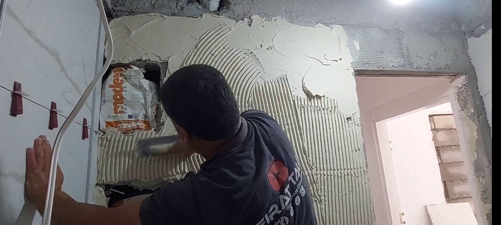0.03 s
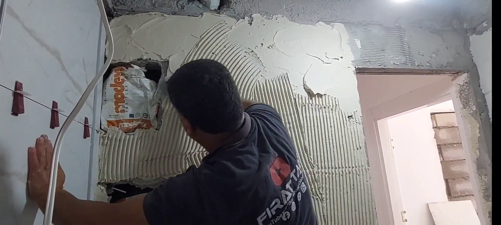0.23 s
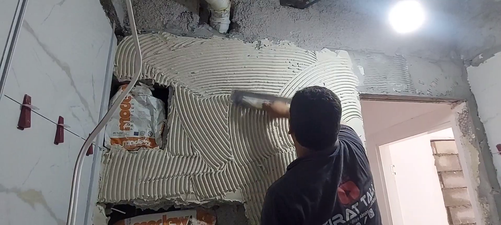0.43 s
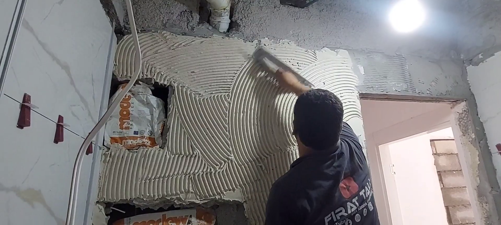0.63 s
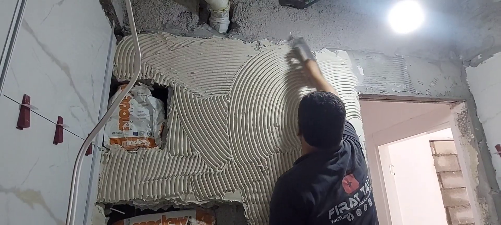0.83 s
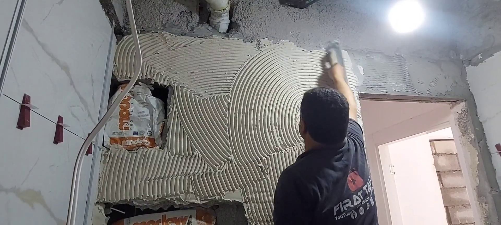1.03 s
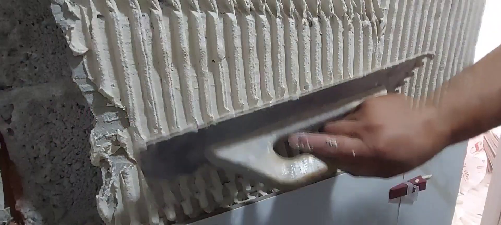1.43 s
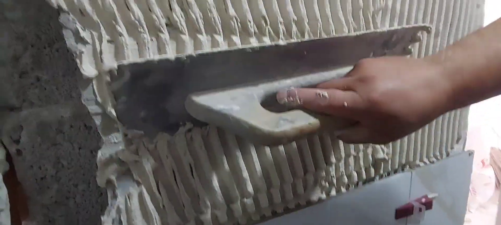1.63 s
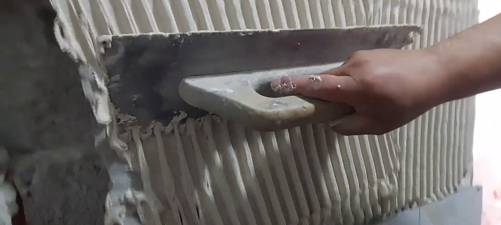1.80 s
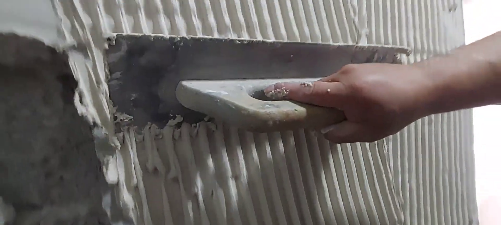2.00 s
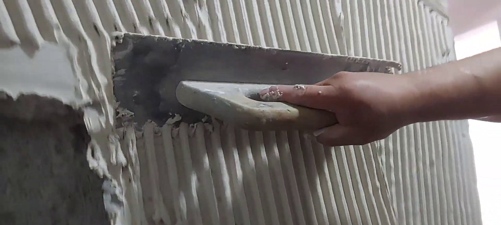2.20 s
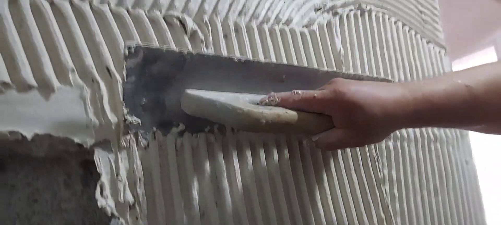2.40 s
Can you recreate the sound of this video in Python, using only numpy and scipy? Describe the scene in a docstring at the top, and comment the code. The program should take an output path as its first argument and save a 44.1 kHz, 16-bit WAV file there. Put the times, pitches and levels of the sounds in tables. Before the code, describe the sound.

A notched trowel scrapes adhesive across a wall in a small, bare room. A short push swells until 0.3 seconds, then a long, hollow, more distant sweep runs to 1.3, with a soft bump near 1.1. A close, gritty pull builds from 1.4 to 2.4 seconds, with small cracking grains and a wet hiss. A light knock comes at 2.5. A faint low rumble lies underneath.

```python
"""A notched steel trowel combs tile adhesive on the wall of a small, bare bathroom: three abrupt strokes.
The teeth stick and slip (low rasp); sand crunches and hisses under the blade. Faint rumble and whine.
0-0.3 s: a short push of growing force. 0.3-1.3 s: a wide arc heard from across the room; wall and room
ring hollow, the trowel bumps late in the sweep. From 1.3 s: a close, gritty pull; coarse grains crack,
wet adhesive hisses through the notches. At 2.5 s: a light knock."""
import sys
import numpy as np
from scipy import signal
from scipy.fft import rfft, irfft, next_fast_len
from scipy.io import wavfile
from scipy.ndimage import uniform_filter1d

SR = 44100
rng = np.random.default_rng(int(sys.argv[2]) if len(sys.argv) > 2 else 0)


def wav_record(signal):
    """Record a signal, one row per channel, as 16-bit PCM in the file named by sys.argv[1]."""
    frames = np.transpose(np.atleast_2d(signal))
    bounded = np.clip(frames, -1, 1)
    # unit amplitude maps onto the largest positive 16-bit level
    quanta = np.round(bounded * 32767).astype(np.int16)
    wavfile.write(sys.argv[1], SR, quanta)


N = 112454
TIME_S = np.arange(N) / SR
FFT_SIZE = 2 * next_fast_len((N + SR // 2) // 2)
FREQ_HZ = np.maximum(np.arange(FFT_SIZE // 2 + 1) * SR / FFT_SIZE, 1)
PUSH_END_S, ARC_END_S = .301, 1.327

# room decay: f/Hz, t60/s
ROOM_DECAY = [(250, 0.41), (1000, 0.31), (4000, 0.2), (12000, 0.053)]
# left-right correlation of the room tail: f/Hz, correlation/1
ROOM_CORRELATION = [(150, 0.93), (300, 0.75), (600, 0.52), (1100, 0.014), (16000, 0)]
# building rumble: f/Hz, relative density/dB
RUMBLE_SPECTRUM = [(25, -16), (48, 11), (75, 6), (130, 2), (220, -9), (600, -19.5), (1500, -31),
                   (5000, -25), (6800, -43), (16000, -42)]
# electrical whine: f/Hz, level/dB
WHINE_PARTIALS = [(4662, -72), (9320, -70.5), (13980, -75)]
# wall and room modes: f/Hz, scrape gain/dB, bump level/dB, t60/s
WALL_MODES = [(249.4, -13, -31.5, 0.59), (297.8, -10, -28.5, 0.77), (376.7, -17, -53, 0.29),
              (421.3, -15, -44, 0.96), (523.5, -18, -46, 0.34), (593, -40, -21.5, 0.2),
              (619, -11.5, -41, 0.29), (742, -19, -34, 0.35), (796, -12, -42, 0.56)]
# blade modes, damped by adhesive: f/Hz, gain/dB, t60/s
DAMPED_BLADE_MODES = [(2250, -21, .009), (3330, -18, .011), (3950, -7.5, .008), (4300, -7, .009),
                      (5700, -14, .004)]
# coarse grains cracking: t/s, impulse level/dB
CRACK_IMPULSES = [(1.5598, -4.5), (1.8612, -11), (1.8735, -6), (2.0513, -6.5), (2.0768, -9), (2.1818, -6),
                  (2.2012, -8), (2.2085, -9), (2.2855, -9), (2.2903, -6)]
# teeth catching in thicker adhesive: t/s, half-width/s, rasp swell/dB, grit swell/dB
TOOTH_CATCHES = [(1.862, .016, 3.5, 3), (2.037, .011, 7, 3), (2.098, .004, 0, 6), (2.138, .017, 7.5, 2.5),
                 (2.208, .009, 1, 3.5), (2.291, .007, 0, 3.5)]
# stroke envelopes, before trim: t/s, crunch level/dB, rasp level/dB, hiss level/dB
PUSH_LEVELS = [(0.088, -71, -85, -72), (0.102, -49, -50, -53), (0.126, -53.5, -43.5, -59),
               (0.168, -51, -59, -53), (0.19, -39, -41, -48), (0.226, -33, -30.5, -37),
               (0.265, -28.5, -27.5, -33.5), (0.298, -21, -23.5, -30.5)]
ARC_LEVELS = [(0.305, -43, -46, -51), (0.339, -28, -28.5, -35.5), (0.375, -30.5, -32.5, -33.5),
              (0.401, -26, -22.5, -33.5), (0.459, -27.5, -26.5, -35.5), (0.519, -25, -24, -33.5),
              (0.645, -24.5, -22.5, -32.5), (0.765, -26.5, -26, -32.5), (0.843, -30.5, -31, -41.5),
              (0.977, -25, -22.5, -34.5), (0.997, -25, -30.5, -32), (1.075, -28.5, -30, -31),
              (1.155, -34.5, -30, -43.5), (1.169, -33, -47, -47), (1.185, -33.5, -37, -40),
              (1.239, -43, -45, -51), (1.301, -63, -68, -64), (1.32, -85, -63, -89)]
PULL_LEVELS = [(1.335, -49, -52, -53), (1.4, -43, -44.5, -47), (1.47, -29, -40, -37.5),
               (1.51, -37.5, -36.5, -46), (1.56, -31.5, -34.5, -39), (1.61, -35.5, -38, -41),
               (1.72, -31.5, -34, -35.5), (1.87, -25, -29.5, -34), (1.92, -25, -31, -31.5),
               (2.0, -25, -31, -33), (2.1, -27, -28.5, -30), (2.18, -24.5, -28, -28),
               (2.29, -24.5, -28.5, -28.5), (2.37, -29, -33.5, -38), (2.41, -59, -52, -47.5),
               (2.48, -52, -66, -64), (2.55, -65, -49, -66)]
# colour of blade and wall: f/Hz, relative density/dB
PUSH_SPECTRUM = [(40, -9), (85, 12), (130, 0), (210, -6.5), (400, 3.5), (660, -0.5), (820, 2.5),
                 (1300, -0.5), (2200, -11.5), (3300, -7), (4800, -4), (6500, -16.5), (8000, -14),
                 (10000, -10), (16000, -11.5)]
ARC_SPECTRUM = [(50, -33), (100, -9.5), (195, -15.5), (250, -1.5), (470, 2), (620, 4.5), (820, 5.5),
                (1050, 1.5), (1700, -8.5), (2700, -11), (3700, -8.5), (4600, -6), (5400, -12.5),
                (6500, -27.5), (8000, -25), (10000, -22), (13000, -17), (16000, -22.5)]
PULL_SPECTRUM = [(50, -26), (110, -11.5), (170, -9.5), (270, -2), (350, -5), (550, -0.5), (720, 0.5),
                 (900, 1.5), (1350, -1.5), (1800, 0.5), (2650, -3), (3500, 1.5), (4500, 2.5), (5200, -1.5),
                 (6000, -5.5), (7000, -20.5), (8300, -21), (10700, -16.5), (16000, -19.5)]
# stereo position: f/Hz, left minus right/dB
PUSH_BALANCE = [(100, 2.5), (400, 2), (800, 8), (1300, 0), (2300, 5), (4200, -3), (5500, 11), (7000, 16),
                (11000, 11)]
ARC_BALANCE = [(150, -1), (400, 6.5), (650, 1), (1100, 2.5), (2000, 0.5), (3000, 1.5), (4200, -4),
               (5500, 2), (8200, 9.5), (12500, -1.5), (16000, -2)]
PULL_BALANCE = [(300, 0.5), (700, 0), (1200, 0.5), (1800, -2.5), (2700, -2), (3500, -8.5), (4700, -6),
                (5700, 6.5), (6800, 13), (8300, 18), (10800, 2.5), (16000, 3.5)]


def from_db(db):
    """Decibels to gain."""
    return 10 ** (np.asarray(db) / 20)


def rms(x):
    """Root mean square."""
    return np.sqrt(np.mean(x ** 2) + 1e-20)


def per_bin(table):
    """Table interpolated to the FFT bins over log frequency."""
    hz, value = np.transpose(table)
    return np.interp(np.log(FREQ_HZ), np.log(hz), value)


def pan(balance_db):
    """Constant-power left and right gains."""
    gains = from_db(np.array([[.5], [-.5]]) * balance_db)
    return gains / np.sqrt(np.mean(gains ** 2, axis=0))


def minimum_phase(gain):
    """Causal response with the given magnitude."""
    cepstrum = irfft(np.log(gain + 1e-7))
    cepstrum[..., 1:FFT_SIZE // 2] *= 2
    cepstrum[..., FFT_SIZE // 2 + 1:] = 0
    return np.exp(rfft(cepstrum))


def filtered(x, response):
    """Apply a frequency response."""
    return irfft(rfft(x, FFT_SIZE) * response)[..., :N]


def high_pass(x, hz):
    """Second-order bass cut."""
    return signal.sosfilt(signal.butter(2, hz, "high", fs=SR, output="sos"), x)


def drift(bandwidth_hz):
    """Low-passed noise, rms 1."""
    slow = filtered(rng.standard_normal(FFT_SIZE), 1 / (1 + (FREQ_HZ / bandwidth_hz) ** 2))
    return slow / rms(slow)


def ring(x, hz, t60_s):
    """One mode: a unit impulse starts a decaying unit sine."""
    radius = from_db(-60 / (t60_s * SR))
    step_rad = 2 * np.pi * hz / SR
    return signal.lfilter([0, np.sin(step_rad)], [1, -2 * radius * np.cos(step_rad), radius ** 2], x + 1e-18)


def impulse(t_s, level_db):
    """Single-sample click."""
    return from_db(level_db) * (np.arange(N) == int(t_s * SR))


def gate(start_s, end_s):
    """Window with 2 ms fades."""
    return np.clip(np.minimum(TIME_S - start_s, end_s - TIME_S) / .002, 0, 1)


def bathroom():
    """Diffuse stereo frequency response: treble dies first, bass is alike in both ears."""
    noise = rfft(rng.standard_normal((2, N)), FFT_SIZE)
    gap_s, tail = .00291, 0
    for band_hz, t60_s in ROOM_DECAY:
        band = per_bin([(hz, hz == band_hz) for hz, _ in ROOM_DECAY])
        decay = from_db(-60 * TIME_S / t60_s) * (TIME_S > gap_s)
        tail += irfft(noise * band)[:, :N] * decay / np.sqrt(np.sum(decay ** 2))
    spectrum = rfft(tail, FFT_SIZE)
    mid, side = spectrum / np.sqrt(uniform_filter1d(abs(spectrum) ** 2, size=250, axis=1))
    correlation = per_bin(ROOM_CORRELATION)
    return np.sqrt((1 + correlation) / 2) * mid + np.sqrt((1 - correlation) / 2) * side * [[1], [-1]]


def in_room(x, room, room_db):
    """Direct sound plus tail."""
    return filtered(x, 1 + from_db(room_db) * room)


def rumble(mid_db=-52.5, side_gain_db=-10):
    """Steady low background of the building."""
    mid, side = filtered(rng.standard_normal((2, FFT_SIZE)), from_db(per_bin(RUMBLE_SPECTRUM)))
    return from_db(mid_db) * (mid + from_db(side_gain_db) * side * [[1], [-1]]) / rms(mid)


def whine():
    """Thin, unsteady electrical tone with two overtones."""
    return sum(from_db(db) * drift(bandwidth_hz=90) * np.sin(2 * np.pi * hz * TIME_S)
               for hz, db in WHINE_PARTIALS)


def knock(room):
    """Light knock: one heavily damped mode."""
    return in_room(ring(impulse(t_s=2.5065, level_db=-27.5), hz=710, t60_s=.0078), room, room_db=-4)


def squeeze(peak_s=2.275, half_width_s=.05, centre_hz=11000, half_width_hz=900, level_db=-30):
    """Wet adhesive hisses through the notches under the hardest pressure."""
    hiss = filtered(rng.standard_normal((2, N)), 1 / (1 + ((FREQ_HZ - centre_hz) / half_width_hz) ** 2))
    swell = np.exp(-((TIME_S - peak_s) / half_width_s) ** 2)
    return from_db(level_db) * swell * hiss / rms(hiss)


def cracks(room, crumble_s=.0015, crumble_db=-27, clink_db=-2.5, fizz_db=-14):
    """Coarse grains snap and crumble: the coated blade clinks, the fragments fizz."""
    snaps = sum(impulse(t_s, db) for t_s, db in CRACK_IMPULSES)
    decays = signal.lfilter([1], [1, -np.exp(-1 / (crumble_s * SR))], snaps + 1e-18)
    crumbling = decays * rng.standard_normal(N)
    force = snaps + from_db(crumble_db) * crumbling
    blade = sum(from_db(db + clink_db) * ring(force, hz, t60_s) for hz, db, t60_s in DAMPED_BLADE_MODES)
    clink = signal.sosfilt(signal.butter(6, [1900, 5200], "band", fs=SR, output="sos"), blade)
    fizz = from_db(fizz_db) * high_pass(crumbling, hz=10000)
    return in_room(pan(balance_db=-7) * clink + fizz, room, room_db=-10)


def trowel_note(re_rasp_db=-8):
    """The trowel's hollow note: a noise-driven mode following the pull's rasp envelope."""
    t_s, _, rasp_db, _ = np.transpose(PULL_LEVELS)
    note = ring(rng.standard_normal(N), hz=713, t60_s=.053)
    return from_db(np.interp(TIME_S, t_s, rasp_db) + re_rasp_db) * note / rms(note)


def wall_ring(slips, bump_s=1.128, start_db=3.5, fade_db_per_s=10):
    """Slips and one bump ring wall and room; the wall answers less as the blade climbs."""
    t_s, _, rasp_db, _ = np.transpose(ARC_LEVELS)
    coupling_db = start_db - fade_db_per_s * (TIME_S - PUSH_END_S)
    force = slips * from_db(np.interp(TIME_S, t_s, rasp_db) + coupling_db)
    wall = 0
    for hz, scrape_db, bump_db, t60_s in WALL_MODES:
        mode_rms_gain = np.sqrt(t60_s * SR / (4 * np.log(1000)))
        wall += ring(from_db(scrape_db) * force / mode_rms_gain + impulse(bump_s, bump_db), hz, t60_s)
    return high_pass(wall, hz=200)   # the wall radiates little bass


def grains(per_s, spread_db, clump_db, clump_hz):
    """Tiny random impacts in clumps, size capped; rms 1."""
    sizes = from_db(spread_db * np.minimum(rng.exponential(1, N), 3)) * rng.choice([-1, 1], N)
    clumps = from_db(clump_db * np.minimum(drift(clump_hz), 1.3))
    impacts = (rng.random(N) < per_s / SR) * sizes * clumps
    return impacts / rms(impacts)


def scrape(drives, levels, spectrum, balance, rooms, room_db, trims_db):
    """Crunch, rasp, hiss from three grain streams; each blade part has its own direction and room tail."""
    rasp_top_hz, crunch_top_hz, max_ear_lag_s = 1500, 6500, .000361
    above_rasp = 1 - 1 / (1 + (FREQ_HZ / rasp_top_hz) ** 10)
    above_crunch = 1 - 1 / (1 + (FREQ_HZ / crunch_top_hz) ** 20)
    bands = above_rasp * (1 - above_crunch), 1 - above_rasp, above_crunch
    t_s, *envelopes_db = np.transpose(levels)
    on_part = rng.integers(0, len(rooms), N) == np.arange(len(rooms))[:, None]
    parts, stereo = 0, 0
    for band, envelope_db, drive, trim_db in zip(bands, envelopes_db, drives, trims_db):
        colour = from_db(per_bin(spectrum)) * np.sqrt(band)
        force = drive * from_db(np.interp(TIME_S, t_s, envelope_db) + trim_db)
        parts += rfft(on_part * force, FFT_SIZE) * minimum_phase(colour / rms(colour))
    for part, room, angle_rad in zip(parts, rooms, np.linspace(-1, 1, len(rooms))):
        ear_lag_s = max_ear_lag_s * np.sin(angle_rad)
        direct = np.exp(1j * np.pi * FREQ_HZ * ear_lag_s * [[1], [-1]])
        stereo += part * (direct + from_db(room_db) * room)
    return irfft(stereo * pan(per_bin(balance)))[:, :N] / np.sqrt((1 + from_db(room_db) ** 2) / 2)


def push(rooms):
    """The blade touches down and is pushed with growing force."""
    slips = grains(per_s=2800, spread_db=4, clump_db=.5, clump_hz=59)
    sand = grains(per_s=11000, spread_db=3.5, clump_db=4.5, clump_hz=60)
    fine_sand = grains(per_s=11000, spread_db=4, clump_db=4, clump_hz=58)
    return scrape([sand, slips, fine_sand], PUSH_LEVELS, PUSH_SPECTRUM, PUSH_BALANCE, rooms,
                  room_db=6, trims_db=(1.2, -1.5, 2.2))


def arc(rooms):
    """Wide, fast sweep: dense grains blurred by the room, over the ringing wall."""
    slips = grains(per_s=3000, spread_db=2, clump_db=1.5, clump_hz=49.7)
    sand = grains(per_s=8200, spread_db=2, clump_db=1.5, clump_hz=60.3)
    fine_sand = grains(per_s=17000, spread_db=3.5, clump_db=2.2, clump_hz=60)
    scraping = scrape([sand, slips, fine_sand], ARC_LEVELS, ARC_SPECTRUM, ARC_BALANCE, rooms,
                      room_db=8, trims_db=(.1, -1.8, .1))
    return scraping + wall_ring(slips)


def pull(rooms, judder_db=2):
    """Slow, close pull: uneven pressure makes it judder, the teeth catch; a knock follows."""
    t_s, half_width_s, rasp_db, grit_db = np.transpose(TOOTH_CATCHES)
    catches = np.exp(-((TIME_S - t_s[:, None]) / half_width_s[:, None]) ** 2)
    swells = from_db(np.array([grit_db, rasp_db, grit_db]) @ catches)
    judder = from_db(judder_db * np.tanh(drift(bandwidth_hz=80)))
    slips = grains(per_s=2200, spread_db=2.5, clump_db=2, clump_hz=90)
    sand = grains(per_s=7000, spread_db=4, clump_db=3.5, clump_hz=170)
    fine_sand = grains(per_s=8700, spread_db=2.5, clump_db=3.5, clump_hz=200)
    drives = judder * swells * np.array([sand, slips, fine_sand])
    scraping = scrape(drives, PULL_LEVELS, PULL_SPECTRUM, PULL_BALANCE, rooms,
                      room_db=-2.5, trims_db=(-1.3, -3, -.5))
    return scraping + trowel_note() + squeeze() + cracks(rooms[0]) + knock(rooms[0])


def scene():
    """Three strokes over the background, each breaking off where the next begins."""
    rooms = [bathroom() for _ in range(6)]   # one per blade part
    strokes = (push(rooms) * gate(0, PUSH_END_S)
               + arc(rooms) * gate(PUSH_END_S, ARC_END_S)
               + pull(rooms) * gate(ARC_END_S, N / SR))
    return rumble() + whine() + strokes


def record(dry, bass_cut_hz=58, top_cut_hz=15800):
    """Gentle bass cut, steep top cut."""
    top_cut = minimum_phase(1 / np.sqrt(1 + (FREQ_HZ / top_cut_hz) ** 300))
    return filtered(high_pass(dry, bass_cut_hz), top_cut)


dry = scene()
out = record(dry)
wav_record(out)
```